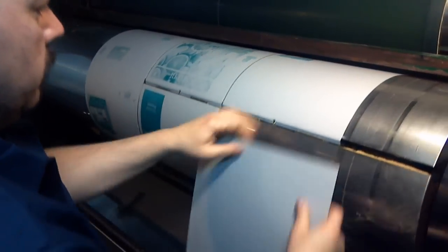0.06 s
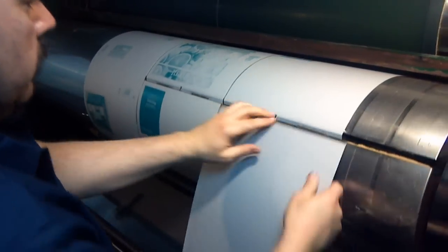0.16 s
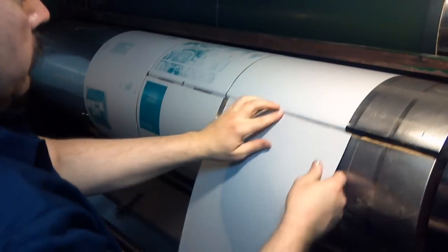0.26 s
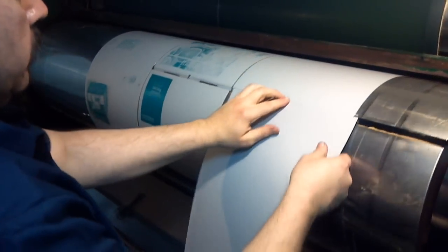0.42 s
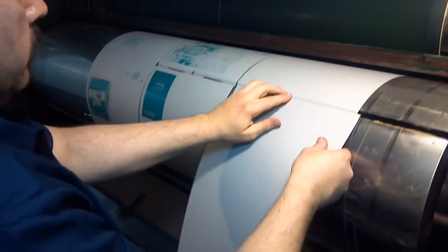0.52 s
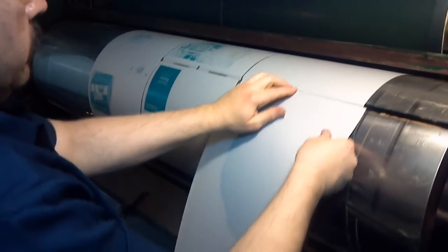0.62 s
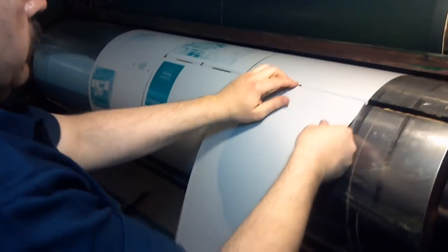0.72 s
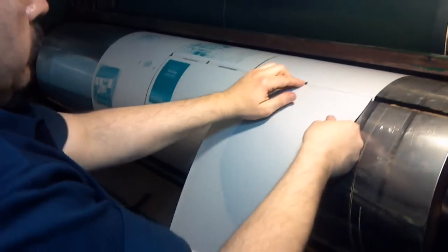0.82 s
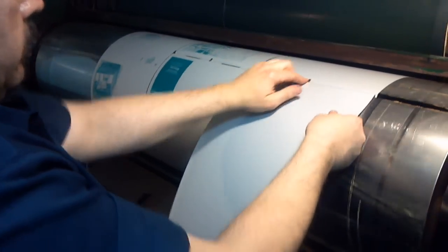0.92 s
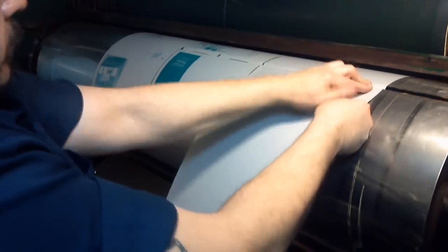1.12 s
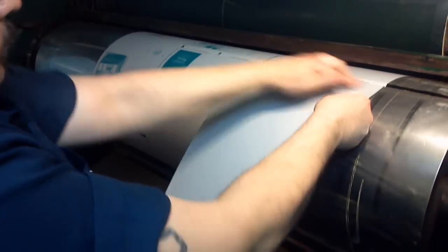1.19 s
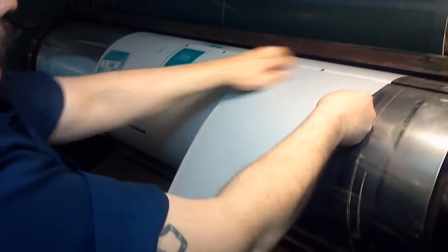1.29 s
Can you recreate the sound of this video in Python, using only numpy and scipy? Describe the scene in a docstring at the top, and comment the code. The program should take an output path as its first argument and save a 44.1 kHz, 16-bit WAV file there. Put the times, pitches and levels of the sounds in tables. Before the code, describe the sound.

A thin metal plate knocks lightly against a press cylinder at about 0.2 seconds and slides briefly. Two more knocks follow at 0.5 and 0.6 seconds, with chattering scrapes and small ticks. At 0.9 seconds it seats with a dull clank, the loudest sound, then rubs faintly at 1.2 seconds. Steady machine hum and hissing air fill the printing hall, quieter after the clank.

```python
"""Printing hall: a thin metal plate is pushed onto a press cylinder. It slides and chatters in dense
slips, knocks three times and seats with a dull clank. Blows ring the damped plate and its free sheet;
the edge fizzes on the steel. Machines hum and air hisses behind, all through a microphone pair.
The gain control ducks at the clank and stays down."""
import sys
import numpy as np
from scipy import signal
from scipy.fft import rfft, irfft
from scipy.io import wavfile
from scipy.ndimage import uniform_filter1d

SR = 44100
rng = np.random.default_rng(int(sys.argv[2]) if len(sys.argv) > 2 else 0)


def int16_out(signal):
    """Quantize to a 16-bit WAV file."""
    q = np.round(np.clip(np.atleast_2d(signal).T, -1, 1) * 32767)
    wavfile.write(sys.argv[1], SR, q.astype(np.int16))


N = 59535
T = np.arange(N) / SR

# plate knocks: (time [s], level per register [dB], span pitch [Hz], span level [dB],
# rattle level [dB], rattle t60 [s], sizzle level [dB])
KNOCKS = [(.2215, (-33, -29, -23, -23, -29.5), 1737, -20.5, -1.5, 0.03, -33),
          (.4903, (-40, -12.5, -20, -24.5, -42.5), 1710, -23.5, 2.5, 0.26, -39.5),
          (.6128, (-28, -11, -19.5, -16, -28), 1470, -13.5, 2, 0.12, -29), (0.878, (4, -2.5, 1, -11, -29),
          1362, -11, -5, 0.16, -29.5)]
# knock registers: (frequency [Hz])
REGISTERS_HZ = (450, 700, 920, 1600, 4500)
# damped modes of the plate on the cylinder: (frequency [Hz], level [dB], t60 [s])
BODY_MODES = [(362.7, -18.5, 0.071), (429, -5, 0.021), (508, -5.5, 0.014), (480, -29.5, 0.39),
              (694, -14.5, 0.047), (779.5, -20, 0.072), (892, -9, 0.02), (1048, -13.5, 0.037),
              (1407, -2, 0.015), (1648, -2, 0.014), (2170, 1.5, 0.011), (3808, -7.5, 0.02),
              (5436, -1.5, 0.0075)]
# ringing modes of the free sheet: (frequency [Hz], level [dB], t60 [s])
SHEET_MODES = [(480, -8, .45), (585, -8, .12), (690, -2, .12), (765, -4, .22), (850, -5, .15),
               (940, -2, .18), (985, -1, .12), (1070, 1, .18), (1260, -4, .18), (1370, -2, .1),
               (1432, 0, .18), (1515, -1, .15), (1623, 0, .18), (1712, -2, .15), (2072, -6, .15),
               (2305, -10, .1), (3838, -14, .2)]
# echoes off the press: (delay [s], left [dB], right [dB])
ECHOES = [(.0026, -43, -9), (.0048, -18, -16)]
# pushes: (time [s], length [s], rub level [dB], sizzle level [dB])
SLIDES = [(0.146, 0.04, -53, -41.5), (0.227, 0.065, -36.5, -93), (0.515, 0.056, -33, -71),
          (0.676, 0.029, -38.5, -80), (0.711, 0.041, -37, -68), (0.762, 0.18, -52, -66),
          (1.204, 0.065, -45.5, -81)]
# plate catches and lets go: (time [s], level [dB])
CATCHES = [(0.303, -55), (0.5341, -42), (0.553, -47), (0.7242, -38.5), (0.748, -44)]
# plate rubbing the cylinder: (frequency [Hz], relative density [dB])
RUB_SPECTRUM = [(60, -49), (130, -10), (250, -4), (400, -7), (650, 2.5), (1100, 6), (1700, 0), (2200, 2.5),
                (2900, -26), (4000, -43), (12000, -52)]
# edge on steel: (frequency [Hz], relative density [dB])
SIZZLE_SPECTRUM = [(1000, 0), (2500, 14), (3700, 6), (6000, 3.5), (8500, 2), (12500, -7.5)]
# motor whine: (harmonic number, level [dB])
WHINE = [(1, -48.5), (2, -48), (3, -53)]
# drones of other machines: (frequency [Hz], level [dB])
DRONES = [(153.3, -63.5), (233.2, -61.5), (317, -64)]
# hall air and machinery: (frequency [Hz], relative density [dB])
AIR_SPECTRUM = [(25, -32), (55, -43), (80, -10), (115, -1.5), (200, -3.5), (290, -1.5), (380, 0.5),
                (800, 2), (1200, -1.5), (2000, -5.5), (2900, -12), (4000, -11), (7500, -10), (12500, -14.5)]
# microphone likeness: (frequency [Hz], correlation [clipped to -1..1 in use])
COHERENCE = [(60, -0.7), (150, 0.45), (400, 0.13), (700, 0.62), (1300, 0.6), (2100, 0.2), (3800, 0),
             (8000, 1.8)]
# microphone balance: (frequency [Hz], left minus right [dB])
BALANCE = [(100, 0), (230, 3), (350, 7.5), (470, 5.5), (700, 2), (1100, -1), (2100, -4), (3500, 0)]
# microphone phase: (frequency [Hz], left lead [rad])
PHASE_LEAD = [(60, -0.59), (120, 0.015), (300, -0.63), (500, -1.25), (700, -0.77), (1100, 1), (1600, 0.85),
              (2400, 0.92), (5000, 1)]


def knocks():
    """Blows, rattle and hall tail drive body and sheet; the loose span nearby rings at its own pitch."""
    touch_lead_s, touch_db = 0.001717, -13.5
    hall_db, hall_t60_s = -8, 0.69
    span_t60_s, swell_t60_s = 0.032, 0.0088
    sheet_db, rattle_db_per_octave = -31.5, 3
    out = np.zeros((2, N))
    for start_s, registers_db, span_hz, span_db, rattle_db, rattle_t60_s, _ in KNOCKS:
        blow = np.zeros((2, N))
        blow[:, int(start_s * SR)] = -1
        blow[:, int((start_s - touch_lead_s) * SR)] -= from_db(touch_db)   # edge touches first
        for delay_s, left_db, right_db in ECHOES:
            blow[:, int((start_s + delay_s) * SR)] += from_db([left_db, right_db])
        tail = from_db(rattle_db) * decay(start_s, rattle_t60_s)
        tail += from_db(hall_db) * decay(start_s, hall_t60_s)
        rattle = tail * diffuse(rng.standard_normal((2, N)))
        colour = list(zip(REGISTERS_HZ, registers_db))
        for modes, modes_db in ((BODY_MODES, 0), (SHEET_MODES, sheet_db)):
            for k, (hz, db, t60_s) in enumerate(modes):
                force = blow + from_db(rattle_db_per_octave * np.log2(hz / 1000)) * rattle
                out += (-1) ** k * from_db(db + modes_db + at_hz(colour, hz)) * ring(force, hz, t60_s)
        out += from_db(span_db) * (ring(blow, span_hz, span_t60_s) - ring(blow, span_hz, swell_t60_s))
    return low_cut(out)


def slides(slips_per_s=2000, spread_db=1, sheet_db=-5, rub_db=0.5):
    """Dense uneven slips rub the plate over the cylinder and ring the sheet."""
    sizes = from_db(spread_db * np.minimum(rng.exponential(1, (2, N)), 4))
    signs = rng.choice([-1, 1], (2, N))
    slips = sizes * signs * (rng.random((2, N)) < slips_per_s / SR)
    force = diffuse(slips)
    sheet = sum((-1) ** k * from_db(db) * ring(force, hz, t60_s)
                for k, (hz, db, t60_s) in enumerate(SHEET_MODES))
    rub = diffuse(slips, RUB_SPECTRUM)
    envelope = pushes([db for _, _, db, _ in SLIDES])
    return envelope * (from_db(sheet_db) * unit_rms(sheet) + from_db(rub_db) * rub)


def pushes(levels_db, attack_s=0.022, release_s=0.047):
    """Sliding envelope: each push rises, holds and dies away."""
    envelope = np.zeros(N)
    for (start_s, length_s, *_), db in zip(SLIDES, levels_db):
        rise = np.clip((T - start_s) / attack_s, 0, 1)
        fall = np.exp(-np.maximum(T - start_s - length_s, 0) / release_s)
        envelope += from_db(db) * rise * fall
    return envelope


def sizzle(attack_s=0.0044, t60_s=0.18):
    """The thin edge fizzes on the steel after each knock and, faintly, while sliding."""
    envelope = pushes([db for *_, db in SLIDES])
    for start_s, *_, db in KNOCKS:
        age_s = np.maximum(T - start_s, 0)
        envelope += np.minimum(age_s / attack_s, 1) * from_db(db - 60 * age_s / t60_s)
    return envelope * diffuse(rng.standard_normal((2, N)), SIZZLE_SPECTRUM)


def catches(t60_s=0.08):
    """Each catch flicks the sheet modes; the hands damp them to a light tick."""
    times_s, levels_db = np.transpose(CATCHES)
    strengths = from_db(levels_db)[:, None] * rng.choice([-1, 1], (len(CATCHES), len(SHEET_MODES)))
    out = np.zeros((2, N))
    for k, (hz, db, _) in enumerate(SHEET_MODES):
        flicks = np.zeros(N)
        flicks[(times_s * SR).astype(int)] = strengths[:, k]
        out += from_db(db) * ring(flicks, hz, t60_s)
    return low_cut(out)


def machine_hum(motor_hz=359.8, waver_hz=14, waver_db=1.9, waver_rad=0.14):
    """Motor whine and low drones, wavering in level and phase."""
    tones = [(motor_hz * harmonic, db) for harmonic, db in WHINE] + DRONES
    out = np.zeros((2, N))
    for hz, db in tones:
        amplitude = np.sqrt(2) * from_db(db + waver_db * drift(waver_hz))
        phase_rad = 2 * np.pi * hz * T + waver_rad * drift(waver_hz)
        out += balance(hz) * amplitude * np.sin(phase_rad)
    return out


def hall_air(level_db=-41.5):
    """Steady diffuse rush of air."""
    return from_db(level_db) * diffuse(rng.standard_normal((2, N)), AIR_SPECTRUM)


def microphone_pair(x, notch_spacing_hz=2605):
    """Differential pair: sides out of step; above the bass, sum and difference cancel in turn."""
    hz = np.fft.rfftfreq(2 * N, 1 / SR)
    shift_rad = at_hz(PHASE_LEAD, hz) * np.array([[.5], [-.5]])
    left, right = rfft(x, 2 * N) * np.exp(1j * shift_rad)
    comb_rad = np.pi * hz / notch_spacing_hz
    mid = (left + right) / 2 * np.abs(np.sin(np.maximum(comb_rad, np.pi / 2)))
    side = (left - right) / 2 * np.abs(np.cos(comb_rad))
    return irfft(np.array([mid + side, mid - side]))[:, :N]


def ring(force, hz, t60_s):
    """One mode in stereo: a click starts a decaying sine."""
    radius, step_rad = from_db(-60 / (t60_s * SR)), 2 * np.pi * hz / SR
    feedback = [1, -2 * radius * np.cos(step_rad), radius ** 2]
    return balance(hz) * signal.lfilter([0, np.sin(step_rad)], feedback, force + 1e-18)


def low_cut(x, cutoff_hz=280):
    """The thin plate radiates little bass."""
    return signal.sosfilt(signal.butter(2, cutoff_hz, "high", fs=SR, output="sos"), x)


def diffuse(pair, spectrum=None):
    """Two independent signals to a diffuse stereo field, rms 1; a spectrum colours and pans it."""
    hz = np.fft.rfftfreq(N, 1 / SR)
    mid, side = rfft(pair)
    coherence = np.clip(at_hz(COHERENCE, hz), -1, 1)
    field = np.sqrt(1 + coherence) * mid + np.sqrt(1 - coherence) * side * [[1], [-1]]
    if spectrum is not None:
        field = field * from_db(at_hz(spectrum, hz)) * balance(hz)
    return unit_rms(irfft(field, N))


def decay(start_s, t60_s):
    """Exponential decay, unit energy."""
    shape = (T >= start_s) * from_db(-60 * np.maximum(T - start_s, 0) / t60_s)
    return shape / np.sqrt(np.sum(shape ** 2))


def drift(corner_hz):
    """Slow random wander, rms 1."""
    hz = np.fft.rfftfreq(2 * N, 1 / SR)
    spectrum = rfft(rng.standard_normal(2 * N)) / (1 + (hz / corner_hz) ** 2)
    return unit_rms(irfft(spectrum)[:N])


def balance(hz):
    """Left and right gains at a frequency."""
    return from_db(np.array([[.5], [-.5]]) * at_hz(BALANCE, hz))


def at_hz(table, hz):
    """Interpolate on a log-frequency axis."""
    points_hz, values = np.transpose(table)
    return np.interp(np.log(hz + 1e-9), np.log(points_hz), values)


def unit_rms(x):
    """Scale to rms 1."""
    return x / np.sqrt(np.mean(x ** 2) + 1e-20)


def from_db(db):
    """Decibels to gain."""
    return 10 ** (np.asarray(db) / 20)


def scene():
    """The plate in front of running machinery."""
    return microphone_pair(knocks() + slides() + sizzle() + machine_hum() + hall_air() + catches())


def record(dry, limit_db=-20, detect_s=0.014, attack_s=0.00089, cutoff_hz=12700):
    """Gain control with fast attack and no recovery, then a steep low-pass."""
    power = uniform_filter1d(np.mean(dry ** 2, axis=0), int(detect_s * SR))
    over_db = np.maximum(10 * np.log10(np.abs(power) + 1e-12) - limit_db, 0)
    held_db = np.maximum.accumulate(over_db)
    pole = np.exp(-1 / (attack_s * SR))
    duck_db = signal.lfilter([1 - pole], [1, -pole], held_db)
    low_pass = signal.ellip(12, .1, 90, cutoff_hz, fs=SR, output="sos")
    return signal.sosfilt(low_pass, dry * from_db(-duck_db))


dry = scene()
out = record(dry)
int16_out(out)
```